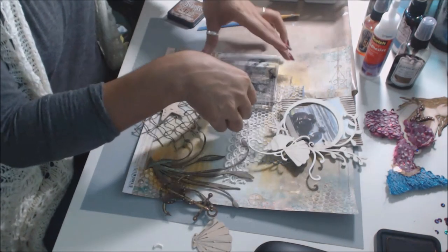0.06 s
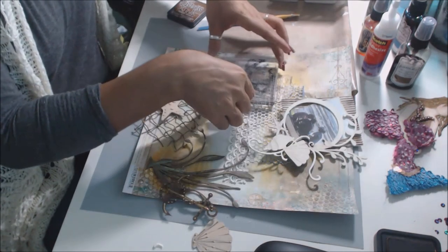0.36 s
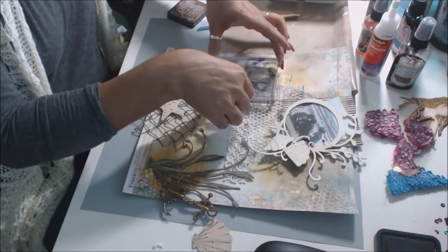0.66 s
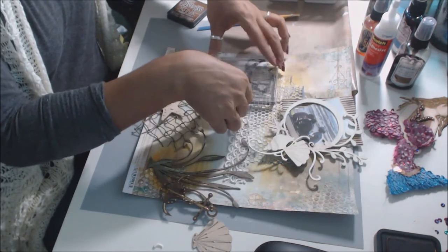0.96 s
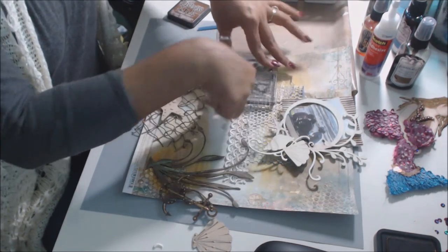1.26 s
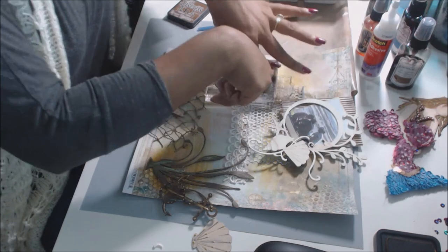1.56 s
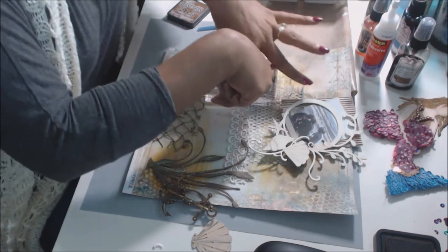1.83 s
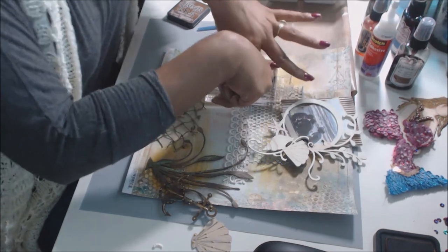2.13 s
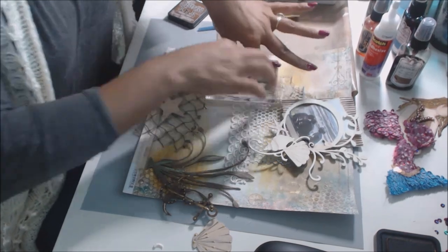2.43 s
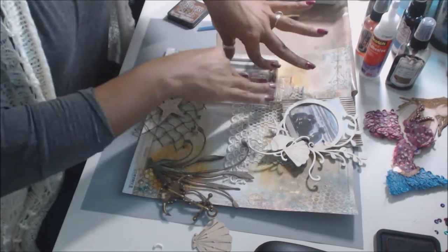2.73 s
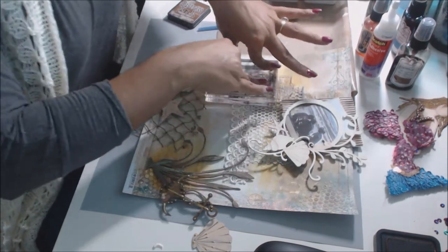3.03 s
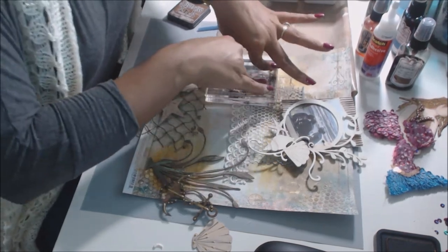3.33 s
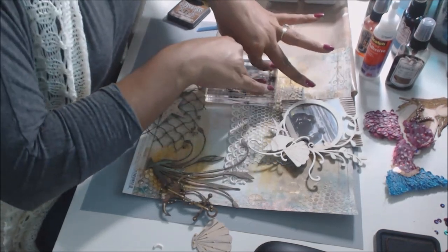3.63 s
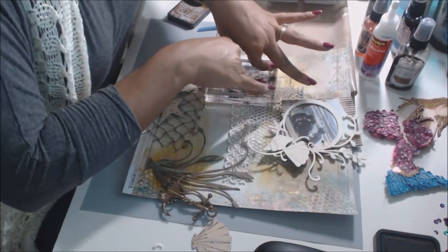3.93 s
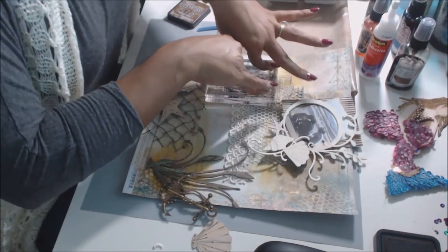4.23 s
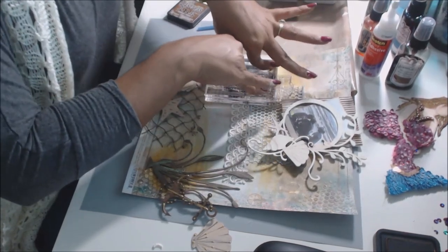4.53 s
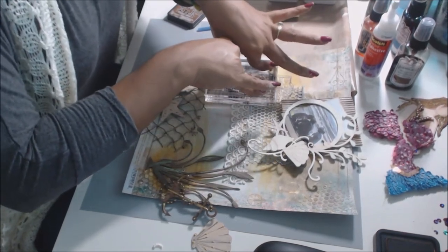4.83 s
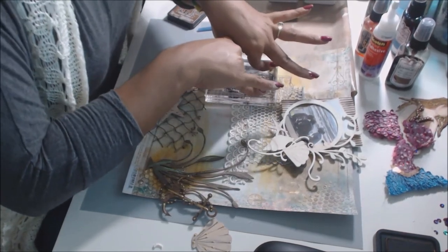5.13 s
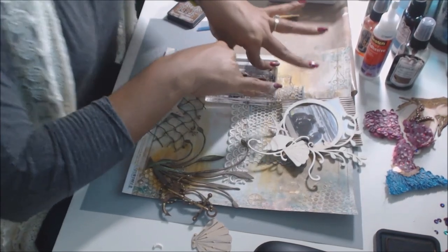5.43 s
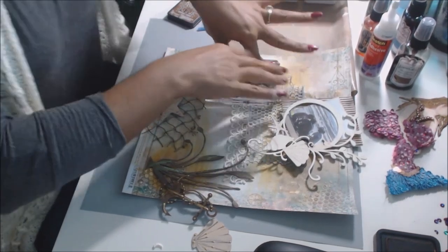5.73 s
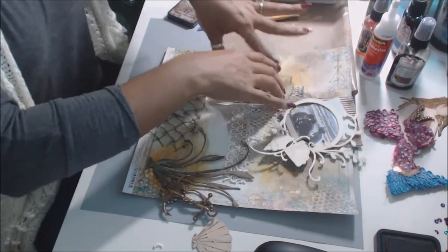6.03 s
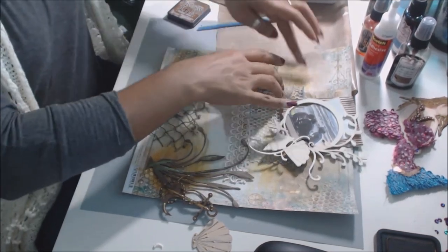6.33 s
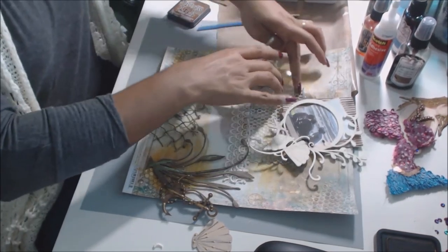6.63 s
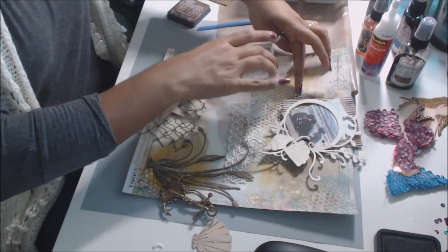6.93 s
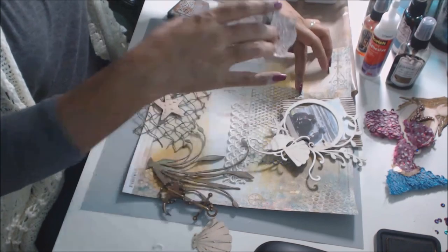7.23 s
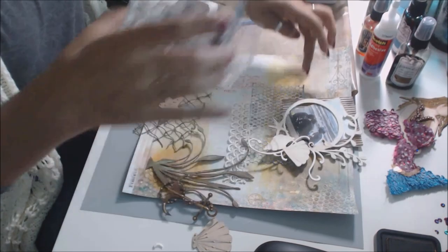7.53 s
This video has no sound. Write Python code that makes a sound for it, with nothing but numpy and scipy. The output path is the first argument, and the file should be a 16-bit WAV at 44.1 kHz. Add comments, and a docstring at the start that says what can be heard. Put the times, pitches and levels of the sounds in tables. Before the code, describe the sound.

Hands press a plastic stamp block onto paper, with soft table knocks, sharp clicks and a tacky peeling crackle over a fan's hum.

```python
"""Stamping at a craft table

A small room, one microphone close to the table. A clear acrylic stamp block is set down on a paper
page, pressed home and peeled off. Block and fingernails click, the table knocks under the pressing
hands, arms shift, and the tacky stamp crackles off the paper. A grainy hiss lingers around the clicks.
Further back, a fan hums steadily behind a faint, even hiss."""
import sys
import numpy as np
from scipy import signal
from scipy.fft import rfft, irfft, next_fast_len
from scipy.io import wavfile

SR = 44100
rng = np.random.default_rng(int(sys.argv[2]) if len(sys.argv) > 2 else 0)


def transcribe(u):
    """Save the signal u as a 16-bit wav file named by the first command-line argument.

    u: samples, shape (n,) or (channels, n), limited to [-1, 1]; the rate is SR.
    q: integer samples, one column per channel.
    """
    v = np.clip(np.atleast_2d(u).T, -1, 1)
    q = np.round(v * 32767).astype(np.int16)
    wavfile.write(sys.argv[1], SR, q)


N = 338221
TIME = np.arange(N) / SR


def from_db(db):
    """Decibels to gain."""
    return 10 ** (np.asarray(db) / 20)


def rms_one(x):
    """Scale to rms 1."""
    return x / np.sqrt(np.mean(x ** 2) + 1e-20)


def add(out, s, sound):
    """Mix a sound in at s seconds."""
    at = round(s * SR)
    out[at:at + len(sound)] += sound[:N - at]


def cut(x, hz, kind, order=2):
    """Low-pass or high-pass."""
    return signal.sosfilt(signal.butter(order, hz, kind, fs=SR, output="sos"), x)


def colour(x, spectrum):
    """Causal (minimum-phase) filter that follows rows of f/Hz, level/dB."""
    size = 2 * next_fast_len(len(x))
    hz, db = np.transpose(spectrum)
    grid = np.maximum(np.arange(size // 2 + 1) * SR / size, 1)
    gain = from_db(np.interp(np.log(grid), np.log(hz), db))
    cepstrum = irfft(np.log(gain))
    cepstrum[1:size // 2] *= 2
    cepstrum[size // 2 + 1:] = 0
    return irfft(rfft(x, size) * np.exp(rfft(cepstrum)))[:len(x)]


def ring(force, hz, t60):
    """One mode: a unit click sets off a dying sine of height 1."""
    r, w = from_db(-60 / (t60 * SR)), 2 * np.pi * hz / SR
    return signal.lfilter([0, np.sin(w)], [1, -2 * r * np.cos(w), r * r], force + 1e-18)


def dying(t, t60):
    """Envelope that falls 60 dB in t60 seconds."""
    return np.exp(-np.log(1000) * t / t60)


def wander(step):
    """Random drift of rms 1, heading for a new value every step samples."""
    knots = np.arange(0, N + step, step) / SR
    return rms_one(np.interp(TIME, knots, rng.standard_normal(len(knots))))


def swells(rows, attack_s, t60):
    """Gain of swells (t/s, length/s, level/dB) that rise, hold and die away."""
    gain = 0
    for s, length, db in rows:
        rise = np.clip((TIME - s) / attack_s, 0, 1)
        gain = gain + from_db(db) * rise * dying(np.maximum(TIME - s - length, 0), t60)
    return gain


def fan(air_db=-48.5):
    """The fan in the background: rumbling air and thin, wavering whines."""
    # spectrum of the moving air: f/Hz, relative level/dB
    air_spectrum = [(25, -63), (45, -23.5), (80, -2), (125, 3.5), (175, -1), (330, -3.5), (480, -9.5),
                    (660, -24.5), (820, -18.5), (1060, -13), (1350, -31), (1950, -20), (2600, -37.5),
                    (6000, -62)]
    # tones of the fan: f/Hz, rms waver/Hz, level/dB
    whines = [(140.4, 2.83, -59.5), (530, 2.62, -66), (817, 6.5, -75.5), (1028, 3.09, -66),
              (1980, 5.28, -74.5)]
    out = from_db(air_db) * rms_one(colour(rng.standard_normal(N), air_spectrum))
    for hz, waver_hz, db in whines:
        pitch = hz + waver_hz * wander(step=1500)
        out += from_db(db) * rms_one(np.sin(2 * np.pi * np.cumsum(pitch) / SR))
    return out


def hiss(level_db=-59.5):
    """A faint, even hiss in the room tone."""
    # spectrum of the hiss: f/Hz, relative level/dB
    spectrum = [(1000, 11.5), (3200, 2.5), (5000, 5), (6400, 5), (7900, -2), (9300, 3.5), (16000, 2.5)]
    return from_db(level_db) * rms_one(colour(rng.standard_normal(N), spectrum))


def leaning_arms(low_hz=88, high_hz=330):
    """Arms and sleeves shift on the table: a soft, low rumble."""
    # arm movements: t/s, length/s, level/dB
    leans = [(1.3, 0.98, -53), (2.7, 0.77, -48), (4.05, 1.2, -52.5), (5.45, 1.5, -50)]
    rumble = cut(rng.standard_normal(N), high_hz, "low", order=3)
    rumble = cut(rumble, low_hz, "high", order=4)
    return swells(leans, attack_s=0.15, t60=2.75) * rms_one(rumble)


def block_clicks(contacts, snap, uneven_db, lead_in=0, lead_t60=0.041, rise_s=0.00072, detune=0.034):
    """A snap and a dying crackle of slips ring the block; lead_in scales the crackle before the snap."""
    # modes of the acrylic block: f/Hz, level against the direct click/dB, t60/s
    block_modes = [(985, -49, 0.048), (1130, -32.5, 0.029), (1630, -48, 0.04), (1930, -38.5, 0.036),
                   (2686, -53, 0.029), (3420, -32.5, 0.008), (4210, -49, 0.031), (5020, -46, 0.028),
                   (6070, -36, 0.023)]
    # tone colour of a click: f/Hz, relative level/dB
    click_spectrum = [(400, 24), (1000, 25), (1400, 20.5), (2000, 27.5), (3200, 17.5), (4500, 20),
                      (6300, 18), (7400, 13.5), (9500, 17), (15500, 15.5)]
    out, onset = np.zeros(N), SR // 40
    t = TIME[:SR // 6] - TIME[onset]
    after = np.maximum(t, 0)
    build_up = lead_in * dying(np.abs(t), lead_t60) * (t < 0)
    rise = 1 - np.exp(-after / rise_s)
    for s, level_db, t60, spot_hz, spot_db, low_hz, high_hz in contacts:
        sizes = rng.standard_normal(len(t)) * from_db(uneven_db * rng.standard_normal(len(t)))
        slips = sizes * (build_up + rise * dying(after, t60))
        force = slips / np.linalg.norm(slips)
        force[onset] += snap
        grip = 1 + detune * rng.standard_normal()   # the fingers' grip shifts the ringing a little
        click = force + sum(from_db(db) * ring(force, hz * grip, decay) for hz, db, decay in block_modes)
        # the spot that is touched favours one resonance
        click += from_db(spot_db) * signal.lfilter(*signal.iirpeak(spot_hz, Q=5, fs=SR), click)
        click = cut(click, low_hz, "high", order=3)
        click = colour(cut(click, high_hz, "low"), click_spectrum)
        onset_rms = np.sqrt(np.mean(click[onset:onset + SR // 100] ** 2))
        add(out, s + t[0], from_db(level_db) * click / onset_rms)
    return out


def nail_taps():
    """Fingernails and the block's edges click; at 6.166 s comes a faint echo of the click just before."""
    # clicks and the one echo: t/s, level over the first 10 ms/dB, crackle t60/s, spot resonance f/Hz,
    # its gain/dB, low edge f/Hz, high edge f/Hz
    taps = [(2.576, -45.5, 0.066, 2980, -19, 1900, 6000), (2.6, -30.5, 0.018, 4470, 5, 2400, 9500),
            (2.6033, -38, 0.02, 4520, 8, 2810, 9500), (2.62, -44, 0.025, 2000, 0, 1500, 11000),
            (2.6285, -45.5, 0.027, 2020, 14, 1500, 6000), (2.6345, -44, 0.059, 4700, -3, 2400, 8000),
            (2.656, -35.5, 0.051, 5930, 6, 1700, 10000), (2.6645, -36, 0.023, 2100, 10, 1520, 12500),
            (2.6715, -39, 0.029, 2000, 0, 1700, 15000), (2.8888, -45.5, 0.011, 900, 4, 550, 4500),
            (3.2855, -38, 0.027, 990, 7.5, 650, 15000), (6.0415, -50, 0.02, 1850, -8, 1000, 1900),
            (6.145, -38.5, 0.039, 2000, -5, 1240, 5170), (6.166, -45.5, 0.014, 2600, -3, 1500, 6000),
            (6.2795, -51.5, 0.015, 1790, 26, 1200, 1900), (6.658, -48, 0.0034, 1400, 0, 910, 2200),
            (6.985, -40.5, 0.022, 5130, 10, 1700, 2000)]
    return block_clicks(taps, snap=0.58, uneven_db=3)


def press(t, contact_hz):
    """Force of one contact of unit impulse; the harder it is, the shorter."""
    w, t = 2 * np.pi * contact_hz, np.maximum(t, 0)
    return w * w * t * np.exp(-w * t) / SR


def bending_waves(x, travel_s):
    """In a board, treble outruns bass; travel_s is the delay at 100 Hz."""
    size = 2 * len(x)
    hz = np.arange(size // 2 + 1) * SR / size
    phase_lag = 4 * np.pi * travel_s * np.sqrt(100 * hz)
    return irfft(rfft(x, size) * np.exp(-1j * phase_lag))[:len(x)]


def knock(contact_hz, deep_db, middle_db, pad_hz, scatter_db=2.0, detune=0.027):
    """One soft blow on the table, peak 1. Where it lands weights the modes; resting hands detune them."""
    # modes of the table top: f/Hz, relative level/dB, t60/s
    table_modes = [(91, -30, 0.074), (115.8, -0.5, 0.18), (137, 3, 0.064), (195, 1, 0.03), (239, 8, 0.057),
                   (291.6, 4.5, 0.11), (333, 2.5, 0.082), (440, -26, 0.049), (484, -5, 0.12),
                   (685, 1, 0.043), (774, 8, 0.031), (983, -8, 0.053)]
    t = TIME[:SR // 3]
    # a weaker, duller echo of the knock from the room
    reflection = from_db(-11.5) * cut(press(t - 0.0365, contact_hz), 395, "low")
    drive = press(t, contact_hz) + reflection
    board = 0
    for hz, mode_db, t60 in table_modes:
        scatter, load = rng.standard_normal(2)
        spot_db = deep_db * (hz < 170) + middle_db * (270 < hz < 450) + scatter_db * scatter
        mode = ring(drive, hz * (1 + detune * load), t60)
        radiated = cut(mode, 0.62 * hz, "high", order=3)   # a mode radiates little below its own pitch
        board = board + from_db(mode_db + spot_db) * radiated
    board = cut(board, 76, "high", order=4)   # below the lowest mode, air slips round the table's edge
    board = cut(board, pad_hz, "low", order=4)   # flesh, paper and mat pad the blow
    board = bending_waves(board, travel_s=0.00321)
    return board / np.abs(board).max()


def pressing_hands():
    """Hands and block push on the table top, which knocks."""
    # pushes: t/s, peak level/dB, contact bandwidth/Hz, deep modes/dB, middle modes/dB, padded above f/Hz
    pushes = [(2.6173, -17.5, 247, -3, -3.5, 550), (2.665, -31, 300, 6, -7, 600),
              (2.8865, -22, 520, 3.5, 1, 1050), (3.077, -25, 160, -6, -1.5, 520),
              (3.155, -36, 110, 21, -4, 600), (3.2849, -17.5, 560, -1.5, -6, 1170),
              (3.618, -37, 300, 17, 0, 700), (4.011, -34, 200, 5.5, -5, 700),
              (4.079, -33.5, 146, -1, 0, 700), (4.186, -33.5, 209, 0, -8, 700),
              (4.5356, -23.5, 320, 5.5, -6.5, 1000), (4.828, -34.5, 250, -5, -8, 696),
              (4.959, -31.5, 249, -4, -4.5, 694), (5.4111, -22, 310, 6, -2, 950),
              (5.441, -15, 370, -1.5, 6.5, 920), (6.029, -27, 130, 8, -8, 700),
              (6.145, -28, 480, -8, -2, 1060)]
    out = np.zeros(N)
    for s, peak_db, *contact in pushes:
        add(out, s, from_db(peak_db) * knock(*contact))
    return out


def hiss_swells(grain_db=3.0):
    """A faint, grainy hiss swells and lingers around the clicks."""
    # swells of hiss: t/s, length/s, level/dB
    spans = [(2.626, 0.026, -45.5), (2.8, 0.86, -61), (6.04, 0.87, -55), (6.95, 0.68, -62)]
    # spectrum of the grainy hiss: f/Hz, relative level/dB
    spectrum = [(300, 14), (1000, 19), (2000, 7.8), (5000, 4.7), (8000, 1.5), (15000, 2.4)]
    grains = from_db(grain_db * wander(step=200))
    grainy_hiss = colour(rng.standard_normal(N) * grains, spectrum)
    return swells(spans, attack_s=0.031, t60=0.84) * rms_one(grainy_hiss)


def peeling_stamp():
    """The tacky stamp stretches and lets go of the paper, patch by patch."""
    # releases: t/s, level over the first 10 ms/dB, crackle t60/s, spot resonance f/Hz, its gain/dB,
    # low edge f/Hz, high edge f/Hz
    peels = [(6.3845, -48, .02, 2200, -14, 1500, 8000), (6.391, -39, 0.0086, 4040, 1, 1700, 8500),
             (6.395, -45.5, 0.044, 1020, 9, 450, 6000), (6.4285, -39.5, 0.014, 1110, -1, 650, 5200),
             (6.4325, -44.5, 0.013, 1300, -5, 650, 5200), (6.437, -42, 0.011, 2800, 2, 1400, 7000),
             (6.4548, -48, 0.0047, 5000, -14, 3000, 14000), (6.457, -42, 0.0081, 1400, -17, 850, 6500),
             (6.4678, -49.5, 0.0033, 4000, -12, 1800, 15000), (6.6933, -43, 0.0065, 3300, -4, 2600, 15000),
             (6.6974, -33, 0.0063, 4960, -7, 2190, 15000), (6.7088, -30, 0.019, 1210, 2, 950, 8500)]
    return block_clicks(peels, snap=0.67, uneven_db=1.5, lead_in=from_db(-20.5))


def tugging_stamp():
    """The peeling stamp tugs the table top, which thumps softly."""
    # pulls on the table: t/s, peak level/dB
    tugs = [(6.39, -33.5), (6.419, -29), (6.454, -53), (6.694, -37), (6.713, -32.5)]
    out = np.zeros(N)
    for s, peak_db in tugs:
        add(out, s, from_db(peak_db) * knock(contact_hz=650, deep_db=5.5, middle_db=0, pad_hz=895))
    return out


def room(x, wet_db, t60, wall_hz, swell_s, bounce_s=0.047, bounce_width_s=0.006, bounce_db=7.0):
    """Diffuse reflections swell and die, dulled by the walls; the far wall returns a little extra."""
    t = TIME[:SR // 2]
    tail = cut(rng.standard_normal(len(t)), wall_hz, "low", order=1)
    tail = cut(tail, 230, "high", order=3)   # the bass stays dry
    bounce = from_db(bounce_db * np.exp(-((t - bounce_s) / bounce_width_s) ** 2))
    tail *= dying(t, t60) * np.minimum(t / swell_s, 1) ** 2 * bounce
    return x + from_db(wet_db) * signal.fftconvolve(x, tail / np.linalg.norm(tail))[:N]


def afterglow(x, late_db=-22, t60=1.3, lowest_hz=900):
    """A faint, bright tail that lingers after each click."""
    t = TIME[:SR]
    tail = cut(rng.standard_normal(len(t)), lowest_hz, "high", order=1) * dying(t, t60)
    return from_db(late_db) * signal.fftconvolve(x, tail / np.linalg.norm(tail))[:N]


def scene():
    """At the microphone, in mono: table and block close by, the small room and the fan behind them."""
    knocks = pressing_hands() + tugging_stamp()
    table = room(knocks, wet_db=-11.0, t60=0.25, wall_hz=4900, swell_s=0.0068)
    clicks = nail_taps() + peeling_stamp()
    block = room(clicks, wet_db=-6.5, t60=0.19, wall_hz=15400, swell_s=0.0047)
    return (table + block + afterglow(block) + leaning_arms() + hiss_swells() + fan() + hiss())[None, :]


def record(dry):
    """The top is cut steeply above 15.9 kHz."""
    return signal.sosfilt(signal.ellip(12, 0.1, 70, 15900, fs=SR, output="sos"), dry)


dry = scene()
out = record(dry)
transcribe(out)
```